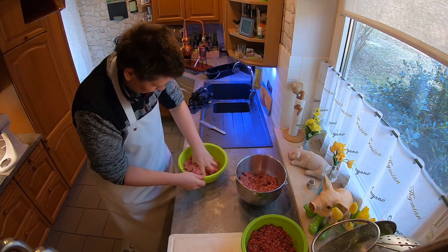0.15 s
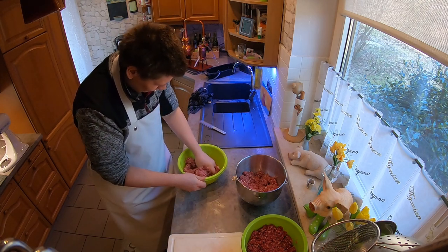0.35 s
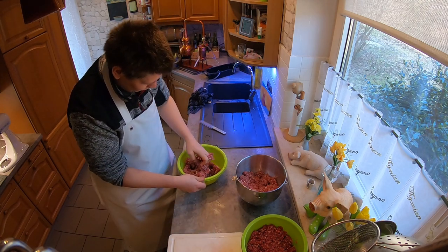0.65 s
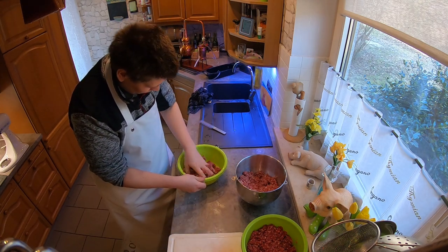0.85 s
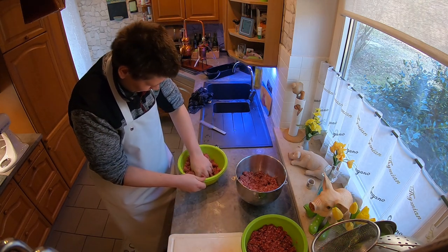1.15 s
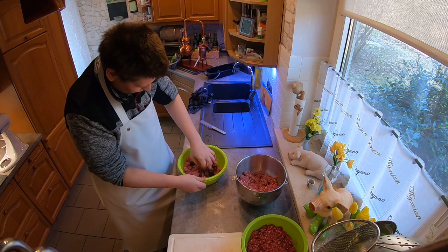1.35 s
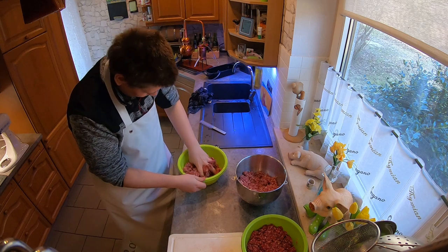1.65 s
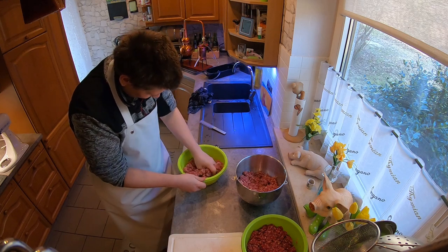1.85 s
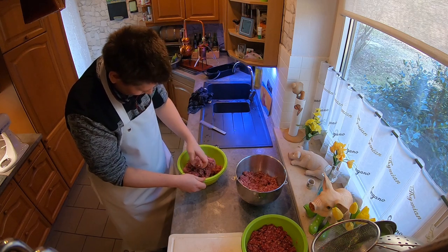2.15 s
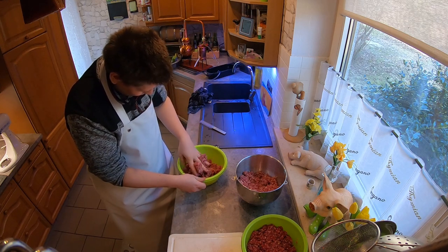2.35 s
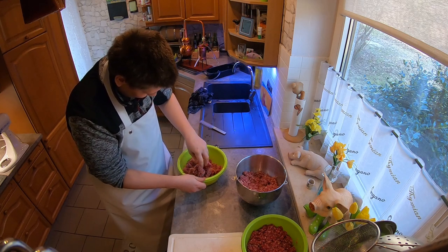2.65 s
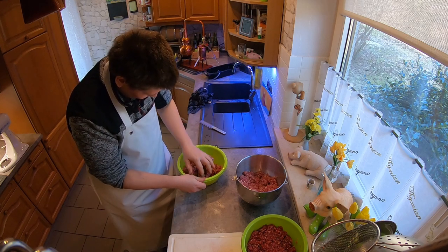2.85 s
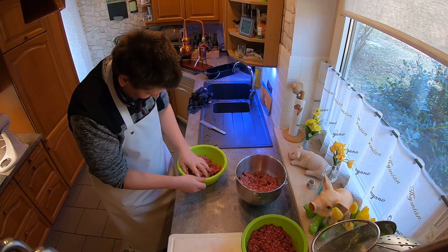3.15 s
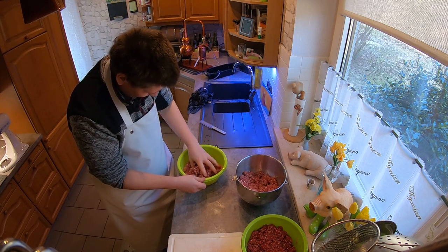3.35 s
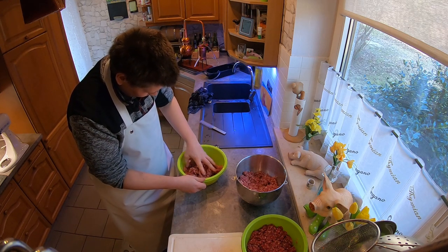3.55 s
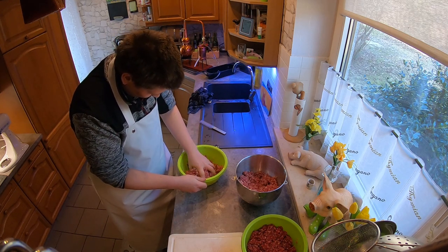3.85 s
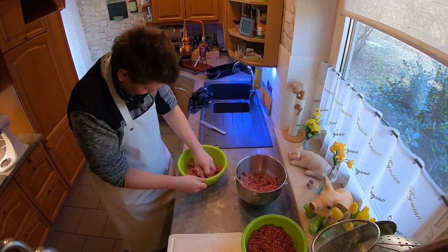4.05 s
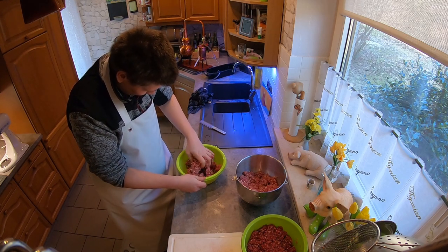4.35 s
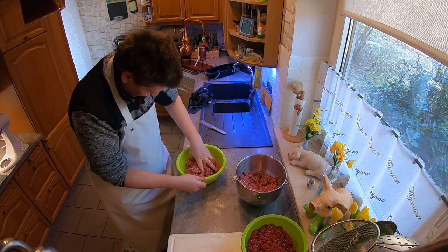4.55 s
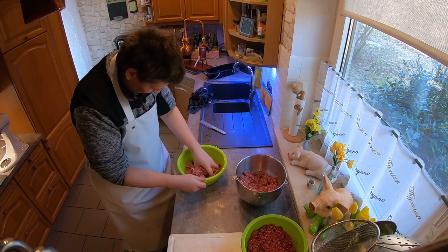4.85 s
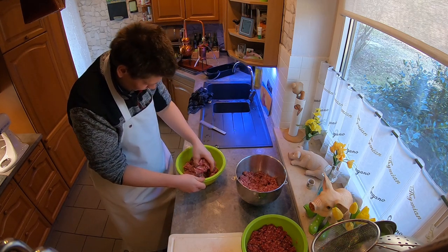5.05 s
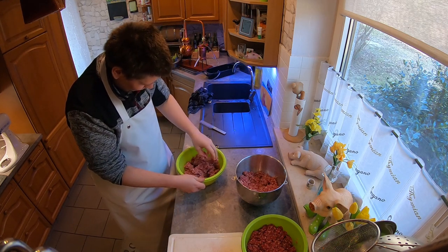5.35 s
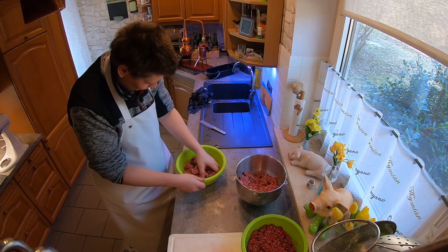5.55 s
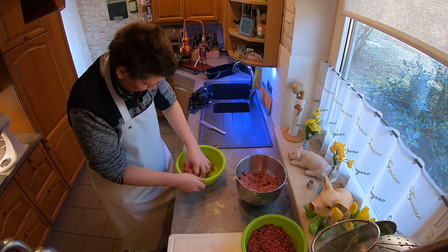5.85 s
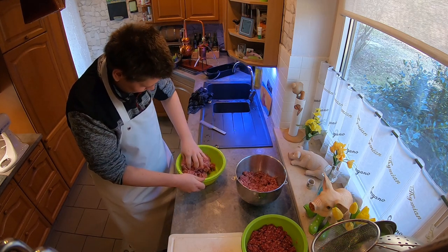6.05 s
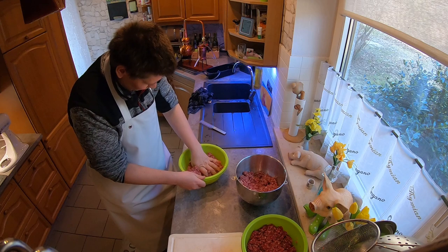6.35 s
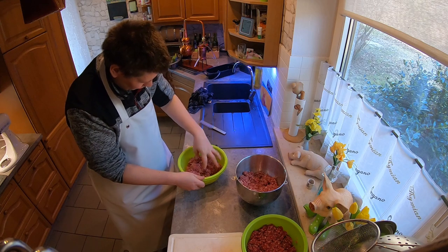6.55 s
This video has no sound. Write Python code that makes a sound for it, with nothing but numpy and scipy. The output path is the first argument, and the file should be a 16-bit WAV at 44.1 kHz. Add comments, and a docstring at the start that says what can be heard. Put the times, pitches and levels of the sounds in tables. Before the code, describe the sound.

A bare hand kneads raw mince in a plastic bowl on a kitchen worktop. Wet squishes and sleeve-like rustles come in uneven pushes, with sticky clicks and a sinking squelch near two seconds. After a quieter lull the bowl knocks hard on the worktop, then kneading resumes with small hollow plops and a last wet snap. Close stereo pickup from above, small room, very faint hum.

```python
"""Wet rustles, squishes, sticky clicks and hollow plops: a bare hand kneads raw mince in a plastic bowl.
The bowl stands on a kitchen worktop in a small room, picked up from above by two microphone ports.
Rubbing is coloured random slips; clicks are bursts of snaps; plops and knocks are decaying resonances.
The bowl is pressed, dragged and once knocked down; room air and a faint mains hum lie underneath."""
import sys
import numpy as np
from scipy import signal
from scipy.fft import rfft, irfft
from scipy.io import wavfile

SR = 44100
rng = np.random.default_rng(int(sys.argv[2]) if len(sys.argv) > 2 else 0)


def digitize_waveform(pressure):
    """Quantize a signal to 16-bit integers and store it at the path in sys.argv[1].

    Rows of a 2-D input are taken as channels; values are limited to [-1, 1].
    """
    field = np.atleast_2d(pressure).T
    bounded = np.clip(field, -1, 1)
    quanta = np.round(bounded * 32767).astype(np.int16)
    wavfile.write(sys.argv[1], SR, quanta)


N = 295460
TIME = np.arange(N) / SR  # seconds


# hand and sleeve slide over the meat; levels are relative:
# start_s [s], attack_s [s], hold_s [s], release_db_per_s [dB/s], level_db [dB]
SLIDES = [(-0.05, 0.045, 0, 75, -54), (0.158, 0.1, .52, 74, -55.5), (0.873, 0.21, .1, 35, -59.5),
          (1.21, 0.088, 0.22, 71, -55.5), (1.606, 0.16, 0.16, 69, -55), (1.86, 0.2, 0, 80, -51.5),
          (2.157, 0.094, 0.11, 145, -54), (2.47, 0.017, .0, 42, -72), (2.94, 0.026, 0.49, 60, -81.5),
          (3.21, 0.2, 0.11, 100, -70.5), (3.39, 0.12, 0, 150, -68), (3.725, .02, 0.053, 60, -70),
          (3.79, 0.12, .38, 68, -57), (4.352, 0.075, 0.066, 147, -56), (4.644, 0.047, 0.31, 38, -63.5),
          (4.82, 0.039, 0.068, 80, -57), (5.0, 0.085, 0.16, 70, -57.5), (5.53, 0.22, 0.02, 39, -64.5),
          (5.78, 0.11, .3, 36, -60.5), (6.154, .14, 0.21, 56, -60.5), (6.479, 0.12, 0, 226, -53.5)]
# the hand presses into the mince; levels are relative, release_db_per_s is that of the fingers:
# start_s [s], attack_s [s], hold_s [s], release_db_per_s [dB/s],
# squeeze_db [dB], wall_scrape_db [dB], bowl_judder_db [dB]
PRESSES = [(-0.02, 0.0093, 0.054, 63, -58.5, -66.5, -80), (0.094, 0.12, 0.32, 60, -58, -64, -63),
           (0.252, 0.032, 0.079, 90, -47.5, -51, -53.5), (0.459, 0.0099, 0.087, 55, -57.5, -55, -75),
           (0.69, 0.037, 0.042, 164, -57, -68, -93), (0.975, 0.01, .1, 63, -56, -63, -73.5),
           (1.091, 0.0083, 0.06, 48.5, -52, -49.5, -54.5), (1.608, 0.0048, 0.044, 42, -56, -62, -72),
           (1.77, 0.015, 0.32, 110, -55.5, -64.5, -73), (2.188, 0.018, 0.12, 186, -61.5, -70, -94),
           (3.739, 0.0098, 0.065, 75, -66.5, -86, -64), (3.861, 0.045, 0.52, 160, -57, -61.5, -71.5),
           (4.691, 0.16, 0, 44, -51, -57, -58), (5.018, 0.033, 0.11, 70, -52.5, -52.5, -72.5),
           (5.248, 0.013, 0.034, 128, -71, -60, -57.5), (5.488, 0.0092, 0, 151, -69, -72, -95.5),
           (5.555, 0.038, 0.18, 30, -58, -64.5, -67), (5.733, 0.014, 0.036, 67, -57.5, -53, -55.5),
           (5.85, 0.085, 0, 41, -58.5, -64, -88), (6.123, 0.14, 0.068, 64, -48.5, -53.5, -45.5),
           (6.48, 0.04, 0.089, 111, -56, -58, -72)]
# the push on the bowl lets go sooner than the fingers do: its release is this many times faster
PUSH_RELEASE_RATIO = 1.69


def hand():
    """Strength over time of sliding, squeezing, scraping and juddering; overlapping movements add in power."""
    slide = sum((from_db(db) * gesture(*shape)) ** 2 for *shape, db in SLIDES)
    squeeze = scrape = judder = 0
    for start_s, attack_s, hold_s, release, squeeze_db, scrape_db, judder_db in PRESSES:
        fingers = gesture(start_s, attack_s, hold_s, release)
        push = gesture(start_s, attack_s, hold_s, release * PUSH_RELEASE_RATIO)
        squeeze = squeeze + (from_db(squeeze_db) * fingers) ** 2
        scrape = scrape + (from_db(scrape_db) * push) ** 2
        judder = judder + (from_db(judder_db) * push) ** 2
    return np.sqrt([slide, squeeze, scrape, judder])


def gesture(start_s, attack_s, hold_s, release_db_per_s):
    """Gain of one movement of the hand: a smooth swell, a hold and a steady fade in decibels."""
    t = TIME - start_s
    swell = np.sin(np.pi / 2 * np.clip(t / attack_s, 0, 1)) ** 2
    return swell * from_db(-release_db_per_s * np.maximum(t - attack_s - hold_s, 0))


# colour of skin and cloth sliding: pitch_hz [Hz], relative level_db [dB per Hz]
SLIDE_COLOUR = [(1200, -37), (2600, -5), (4200, -1), (5500, -1), (7200, 3), (8400, -1.5), (9800, 1),
                (11500, -18.5), (14000, -19), (15600, -49)]
# colour of the squeezed meat: pitch_hz [Hz], relative level_db [dB per Hz]
SQUEEZE_COLOUR = [(700, -18), (1600, -8), (2050, 1.5), (2600, -1.5), (3500, -1.5), (4600, -10.5),
                  (7000, -15), (12000, -34)]
# colour of meat scraping the bowl wall: pitch_hz [Hz], relative level_db [dB per Hz]
SCRAPE_COLOUR = [(120, -15), (250, 0.5), (370, 0), (450, -27.5), (550, 2), (750, 7), (1000, 0.5),
                 (1500, 2.5), (2100, -5), (4000, -38.5)]
# resonances of the filled bowl: pitch_hz [Hz], relative level_db [dB], t60_s [s]
BOWL = [(345, -14, .11), (393, -15, .13), (490, -8, .06), (538, 1, .15), (605, -4, .06), (678, -6, .13),
        (760, -8, .1), (826, -13, .11), (1210, -10, .06)]


def rubbing(room, sliding, squeezing, scraping):
    """Skin and cloth slide, small wet cells burst in the meat, and its grains scrape the bowl wall."""
    rustle = grains(per_s=22000, spread_db=2.5, clump_db=1.6, clumps_per_s=110)
    slide = in_room(convolve(rustle, colour(SLIDE_COLOUR)), room, wet_db=-18)

    bursts = grains(per_s=9000, spread_db=1.5, clump_db=2.5, clumps_per_s=82)
    squish = in_room(convolve(bursts, colour(SQUEEZE_COLOUR)), room, wet_db=-4.5)

    slips = grains(per_s=4000, spread_db=2.5, clump_db=3.0, clumps_per_s=61)
    wall = rms_one(convolve(slips, colour(SCRAPE_COLOUR)))
    bowl_ring = from_db(-27) * rms_one(ring(slips, BOWL))
    scrape = in_room(wall + bowl_ring, room, wet_db=-7)

    return (from_db(1.0) * sliding * rms_one(slide)
            + from_db(-2.0) * squeezing * rms_one(squish)
            + from_db(-1.5) * scraping * rms_one(scrape))


# the hollow under the palm widens and its note sinks: time_s [s], pitch_hz [Hz], level_db [dB]
HOLLOW = [(1.62, 2600, -102), (1.73, 2040, -65.5), (1.83, 1400, -55), (1.94, 1310, -60.5),
          (2.04, 1110, -54.5), (2.11, 810, -62.5), (2.22, 574, -97)]


def hollow(width_hz):
    """Squelching rings in the hollow under the palm, a broad resonance that sinks as the hand lifts."""
    time_s, pitch_hz, level_db = np.transpose(HOLLOW)
    slips = grains(per_s=2000, spread_db=2.5, clump_db=2.0, clumps_per_s=80)
    # shift the moving pitch down to zero, low-pass there, and shift it back up
    turn = np.exp(2j * np.pi * np.cumsum(np.interp(TIME, time_s, pitch_hz)) / SR)
    lowpass = signal.butter(2, width_hz / 2, fs=SR, output="sos")
    rung = turn * signal.sosfilt(lowpass, slips / turn)
    return from_db(np.interp(TIME, time_s, level_db)) * rms_one(rung.real)


# sticky meat lets go: start_s [s], relative snap_db [dB], brightness [dB per octave], decay_s [s, to 1/e]
CLICKS = [(0.356, -23, -2.5, 0.0093), (0.378, -32, -4.5, 0.0027), (0.472, -30.5, -2, 0.0089),
          (0.617, -41, 13, .004), (0.657, -33.5, 9.5, 0.0031), (0.886, -33, 21, 0.00087),
          (1.11, -30, 22, .0043), (1.339, -35.5, -4, 0.0011), (1.658, -37, 14, 0.0037),
          (1.803, -34.5, -1, 0.011), (2.321, -32, 11, 0.0053), (3.17, -56, 19, .003),
          (3.444, -44.5, 26, 0.0032), (3.741, -39.5, -2.5, 0.011), (3.825, -43.5, 8, 0.0087),
          (3.887, -40, -5, 0.0055), (4.874, -37.5, -4.5, 0.0073), (4.961, -40.5, 1.5, 0.029),
          (5.457, -42, 7, 0.0029), (5.502, -45, -4, 0.0044), (5.748, -32, -6, 0.0082),
          (6.461, -22, -6.5, 0.0045), (6.463, -17, 4.5, 0.0024)]
# colour of a wet click before its brightness: pitch_hz [Hz], relative level_db [dB per Hz]
CLICK_COLOUR = [(40, -58), (200, -27.5), (350, -5.5), (550, -23), (850, -7), (1250, 1.5), (1700, 3),
                (2300, 15), (3500, 7), (5500, 2), (7200, 0.5), (10000, -16), (11500, -25), (15500, -60)]
BOWL_SHAKE_DB = -44  # share of each click that shakes the bowl


def wet_clicks(room, size=4000):
    """Sticky meat lets go in a quick run of snaps that swells and dies; the run also sets the bowl ringing."""
    snaps, t = np.zeros(N), TIME[:size]
    for start_s, snap_db, bright_db, decay_s in CLICKS:
        swell_and_die = np.exp(-t / decay_s) * (1 - np.exp(-t / 0.000078))
        run = rng.standard_normal(size) * (rng.random(size) < .6) * swell_and_die
        add(snaps, start_s, from_db(snap_db) * signal.fftconvolve(run, colour(CLICK_COLOUR, bright_db)))
    direct = from_db(-11.5) * in_room(snaps, room, wet_db=0.0)
    bowl_ring = in_room(ring(snaps, BOWL), room, wet_db=6.5)
    return direct + from_db(BOWL_SHAKE_DB) * bowl_ring


def crackle(room, squeezing):
    """Single strands of fat and meat tear off the fingers at random while they squeeze."""
    slips = grains(per_s=70, spread_db=0.5, clump_db=2.0, clumps_per_s=12)
    tears = convolve(slips, colour(CLICK_COLOUR, tilt_db=-3.0))
    return from_db(-15.5) * squeezing * rms_one(in_room(tears, room, wet_db=-6))


# air pockets open in the meat: start_s [s], relative level_db [dB], pitch_hz [Hz], t60_s [s]
PLOPS = [(0.372, -32, 564, 0.02), (5.3885, -27, 668, 0.017), (5.424, -36, 625, 0.012),
         (5.502, -42, 694, 0.016), (5.566, -35, 310, 0.013), (5.748, -31, 694, 0.017),
         (6.463, -24.5, 688, 0.017), (6.492, -37, 550, .02)]


def plops(room):
    """A pocket of air opens and rings for a few cycles."""
    pockets, t = np.zeros(N), TIME[:SR // 10]
    for start_s, level_db, pitch_hz, t60_s in PLOPS:
        envelope = np.exp(-np.log(1000) * t / t60_s) * (1 - np.exp(-t / 0.0015))
        add(pockets, start_s, from_db(level_db) * np.sin(2 * np.pi * pitch_hz * t) * envelope)
    left_right = from_db([[-4], [2]])
    return in_room(pockets * left_right, room, wet_db=2.5)


# the bowl meets the worktop: start_s [s], relative force_db [dB], contact_s [s]
BLOWS = [(0.227, -44.5, 0.0097), (0.276, -36, 0.013), (1.095, -49, 0.0026), (1.108, -46, 0.002),
         (1.606, -47, 0.0066), (1.781, -44.5, 0.0084), (3.738, -57, 0.00079), (4.3234, -27, 0.0011),
         (4.332, -32.5, 0.0026), (4.350, -27.5, 0.00091), (4.394, -40.5, 0.0035), (5.75, -53, 0.0029),
         (6.152, -34, 0.007), (6.463, -52.5, 0.0017)]
# worktop and cupboard under the bowl: pitch_hz [Hz], relative level_db [dB], t60_s [s]
WORKTOP = [(60, -9, .2), (80, -5, .3), (126, -6, .34), (153, -4, .42), (182, -11, .25), (232, -9, .15),
           (271, -6, .42), (312, -10, .15), (348, -8, .28), (393, -10, .36), (489, -16, .15),
           (539, -5, .36), (678, -12, .36), (724, -16, .3), (760, -17, .24), (886, -15, .18)]
# the hard foot of the bowl cracks on the worktop: start_s [s], level_db [dB of energy, direct sound]
CRACKS = [(4.3252, -16.5), (4.3256, -11), (4.3279, 1), (4.3335, -14)]
# colour of that crack: pitch_hz [Hz], relative level_db [dB per Hz]
CRACK_COLOUR = [(40, -36), (130, 19), (280, 16.5), (450, -1.5), (560, 16), (800, 6.5), (1200, -5.5),
                (2200, -1), (3100, -1.5), (4200, -13), (7000, -16.5), (10000, -27), (15000, -62)]


def knocks(room):
    """Long soft pushes move mainly the lowest worktop modes; a short hard landing rings more, and cracks."""
    force, cracks = np.zeros(N), np.zeros(N)
    for start_s, force_db, contact_s in BLOWS:
        push = np.sin(np.pi * np.minimum(TIME[:SR // 20] / contact_s, 1)) ** 2
        add(force, start_s, from_db(force_db) * push / push.sum())
    for start_s, level_db in CRACKS:
        add(cracks, start_s, from_db(level_db) * colour(CRACK_COLOUR))
    # neighbouring modes swing in opposite directions
    boom = ring(force, WORKTOP[::2]) - ring(force, WORKTOP[1::2])
    return in_room(boom, room, wet_db=-17) + in_room(cracks, room, wet_db=1.0)


# colour of the bowl's judder on the worktop: pitch_hz [Hz], relative level_db [dB per Hz]
DRAG_COLOUR = [(50, -23), (110, -29), (152, 4), (200, -0.5), (290, -10), (400, -7.5), (600, -6.5),
               (1500, -17)]
# under the leaning hand the worktop's ring dies this many times sooner
LEANING_DAMPING = 2.4


def drags(room, juddering):
    """The bowl's foot sticks and slips as the hand shoves it; the leaning hand shortens the worktop's ring."""
    slips = grains(per_s=500, spread_db=3.0, clump_db=3.5, clumps_per_s=45)
    damped = [(hz, db, t60_s / LEANING_DAMPING) for hz, db, t60_s in WORKTOP]
    judder = convolve(ring(slips, damped), colour(DRAG_COLOUR))
    return juddering * rms_one(in_room(judder, room, wet_db=1))


# colour of the still room: pitch_hz [Hz], relative level_db [dB per Hz]
FLOOR = [(25, -12.5), (60, -11), (110, -11.5), (160, 3), (300, -2.5), (480, -13), (780, -1.5), (1100, -8.5),
         (2500, -17.5), (6000, -26.5), (9800, -35), (11500, -37), (15000, -50)]
# the diffuse air is far less alike at the two ports: pitch_hz [Hz], left-right likeness [-1 to 1]
AIR_LIKENESS = [(60, 0.56), (110, -0.35), (200, -0.17), (380, -0.12), (700, -0.75), (1300, -0.82),
                (2400, 0.3), (4400, 0.5), (8100, 0.38), (15000, -0.091)]
# mains hum: pitch_hz [Hz], level_db [dB, about which it wavers]
HUM = [(100, -82.5), (200, -88), (300, -77)]


def background(air_db, waver_db):
    """Quiet room air as coloured noise, and a mains hum of sines that waver a little in level."""
    air = rms_one(convolve(two_ears(rng.standard_normal((2, N)), AIR_LIKENESS), colour(FLOOR)))
    hum = 0
    for pitch_hz, level_db in HUM:
        waver = np.interp(TIME, np.linspace(0, TIME[-1], num=50), rng.standard_normal(size=50))
        tone = np.sqrt(2) * np.sin(2 * np.pi * (pitch_hz * TIME + rng.random()))
        hum = hum + from_db(level_db + waver_db * waver) * tone
    return from_db(air_db) * air + hum


# how long the kitchen rings: pitch_hz [Hz], t60_s [s]
ROOM_T60 = [(100, .42), (600, .5), (1500, .34), (4000, .28), (12000, .2)]


def kitchen(first_echo_s, size=26000):
    """Dense reflections of unit energy; each octave dies at its own pace."""
    t = TIME[:size]
    white = rfft(two_ears(rng.standard_normal((2, size))))
    hz = np.arange(size // 2 + 1) * SR / size
    tail = 0
    for centre_hz in 31.25 * 2 ** np.arange(10):
        band = np.maximum(1 - np.abs(np.log2(np.maximum(hz, 1) / centre_hz)), 0)
        decay = np.exp(-np.log(1000) * t / at_hz(ROOM_T60, centre_hz))
        tail = tail + irfft(white * band) * decay
    # silent up to the first echo, full after twice that time
    onset = np.clip(t / first_echo_s - 1, 0, 1)
    return rms_one(tail * onset) / np.sqrt(size)


def in_room(x, room, wet_db):
    """Direct sound plus the kitchen's reflections."""
    return x + from_db(wet_db) * convolve(np.atleast_2d(x).mean(axis=0), room)


# how alike the two ports hear the sources and echoes: pitch_hz [Hz], left-right likeness [-1 to 1]
LIKENESS = [(150, .965), (330, .95), (600, .45), (1100, -.1), (2000, .65), (3600, .72), (6000, .33),
            (8500, -.05), (11000, .2), (15000, .7)]


def two_ears(pair, likeness=LIKENESS):
    """Two unrelated signals become a left and right whose likeness depends on frequency."""
    mid, side = rfft(pair)
    alike = np.clip(at_hz(likeness, np.linspace(0, SR / 2, len(mid))), -.99, .995)
    left_right = np.sqrt(1 + alike) * mid + np.sqrt(1 - alike) * side * [[1], [-1]]
    return irfft(left_right, pair.shape[1]) / np.sqrt(2)


def grains(per_s, spread_db, clump_db, clumps_per_s):
    """Tiny slips of uneven size and random sign whose sizes swell in clumps, in stereo."""
    knots = rng.standard_normal(4000)
    clumps = np.interp(TIME * clumps_per_s, np.arange(len(knots)), knots)
    sizes = from_db(spread_db * np.minimum(rng.exponential(1, (2, N)), 4) + clump_db * clumps)
    signs = rng.choice([-1, 1], (2, N))
    happens = rng.random((2, N)) < per_s / SR
    return two_ears(sizes * signs * happens)


def ring(force, modes):
    """A click sets every mode (Hz, dB, t60 s) ringing; a steady push radiates nothing."""
    out = 0
    for hz, db, t60_s in modes:
        radius = np.exp(-np.log(1000) / (t60_s * SR))
        angle = 2 * np.pi * hz / SR
        poles = [1, -2 * radius * np.cos(angle), radius * radius]
        out = out + from_db(db) * signal.lfilter([.5, 0, -.5], poles, force + 1e-18)
    return out


def colour(spectrum, tilt_db=0, size=2048):
    """Causal (minimum-phase) response of unit energy with this spectrum, tilted per octave."""
    hz = np.maximum(np.arange(size // 2 + 1) * SR / size, 20)
    cepstrum = irfft(np.log(from_db(at_hz(spectrum, hz) + tilt_db * np.log2(hz))))
    # fold the cepstrum onto positive time
    cepstrum[1:size // 2] *= 2
    cepstrum[size // 2 + 1:] = 0
    response = irfft(np.exp(rfft(cepstrum)))
    return response / np.linalg.norm(response)


def convolve(x, response):
    """Pass a sound through a mono or stereo response."""
    return signal.oaconvolve(np.atleast_2d(x), np.atleast_2d(response), axes=1)[:, :N]


def add(track, start_s, sound):
    """Lay a short sound into a track."""
    start = round(start_s * SR)
    track[start:start + len(sound)] += sound[:N - start]


def at_hz(points, hz):
    """Read a table on a log-frequency axis."""
    table_hz, values = np.array(points).T
    return np.interp(np.log(np.maximum(hz, 1)), np.log(table_hz), values)


def from_db(db):
    """Decibels to gain."""
    return 10 ** (np.asarray(db) / 20)


def rms_one(x):
    """Scale to unit power."""
    return x / np.sqrt(np.mean(x ** 2) + 1e-20)


def scene():
    """All the sounds share one kitchen; each place on the worktop has its own pattern of reflections."""
    at_hand, at_meat, at_foot = (kitchen(first_echo_s=0.001) for place in range(3))
    sliding, squeezing, scraping, juddering = hand()
    meat = rubbing(at_hand, sliding, squeezing, scraping) + hollow(width_hz=600)
    meat = meat + crackle(at_meat, squeezing) + wet_clicks(at_meat) + plops(at_hand)
    bowl = knocks(at_foot) + drags(at_foot, juddering)
    return meat + bowl + background(air_db=-66.0, waver_db=2.2)


# balance of the two microphone ports: pitch_hz [Hz], left minus right level_db [dB]
BALANCE_DB = [(150, -.6), (350, -.8), (600, -3), (1100, -.8), (3500, -1.4), (5500, -2.3), (7800, -2),
              (9000, 3.5), (11000, .5)]
CUTOFF_HZ = 15700


def record(dry):
    """The two microphone ports colour the sound differently; the top is cut steeply."""
    hz = np.arange(N // 2 + 1) * SR / N
    port_gains = from_db(at_hz(BALANCE_DB, hz) * np.array([[.5], [-.5]]))
    ports = irfft(rfft(dry) * port_gains, N)
    lowpass = signal.ellip(10, .2, 80, CUTOFF_HZ, fs=SR, output="sos")
    return signal.sosfilt(lowpass, ports)


dry = scene()
out = record(dry)
digitize_waveform(out)
```